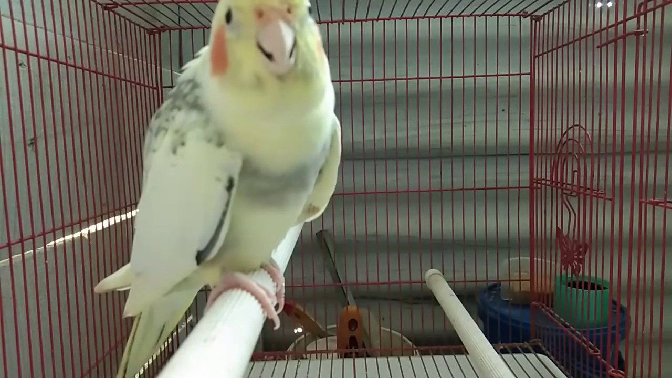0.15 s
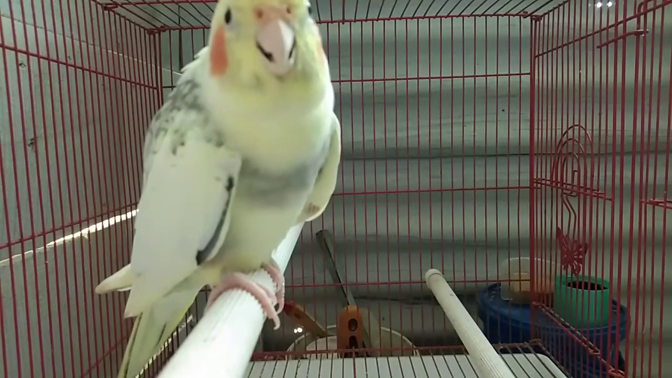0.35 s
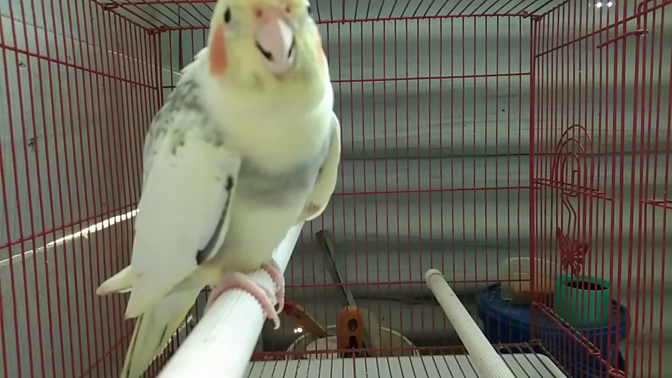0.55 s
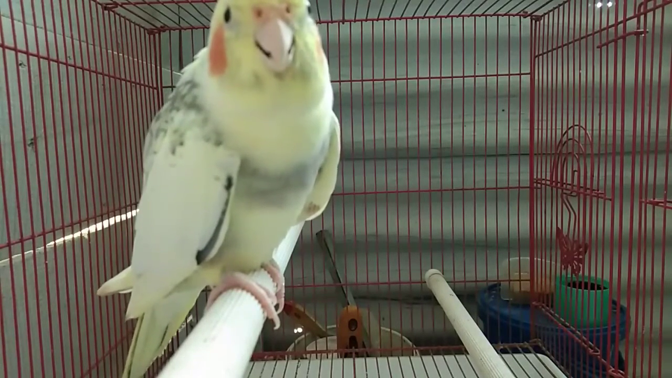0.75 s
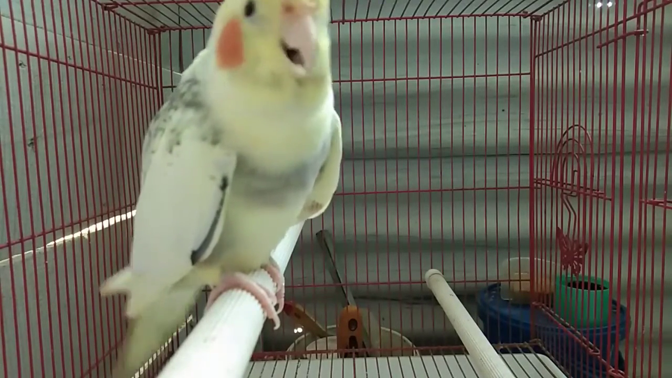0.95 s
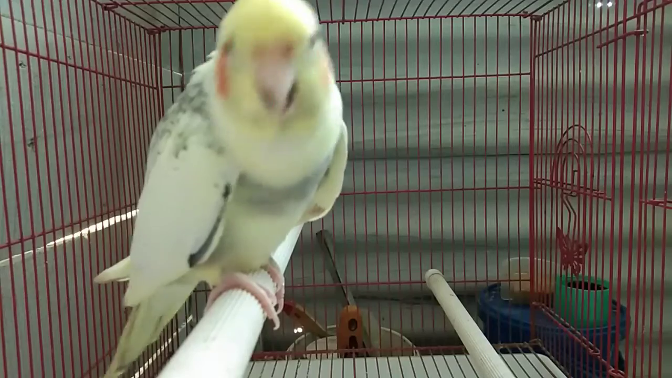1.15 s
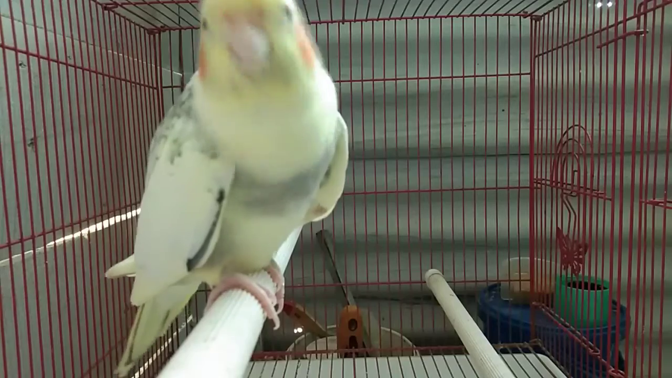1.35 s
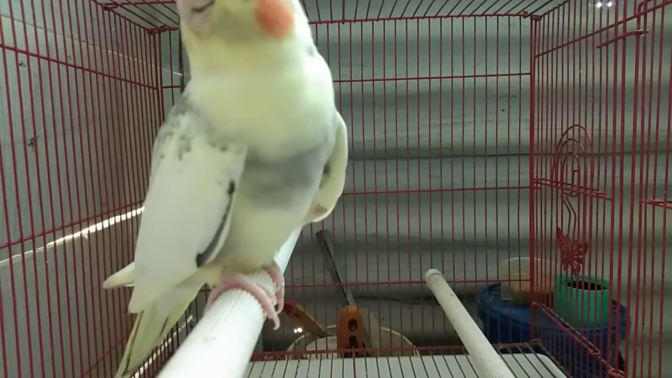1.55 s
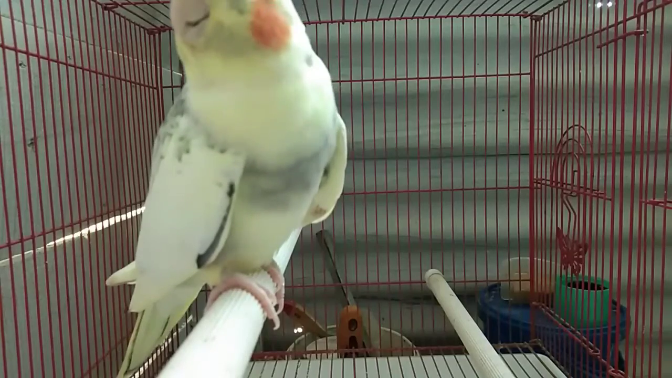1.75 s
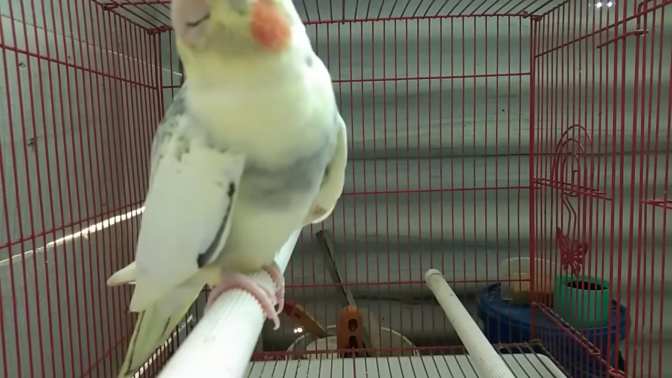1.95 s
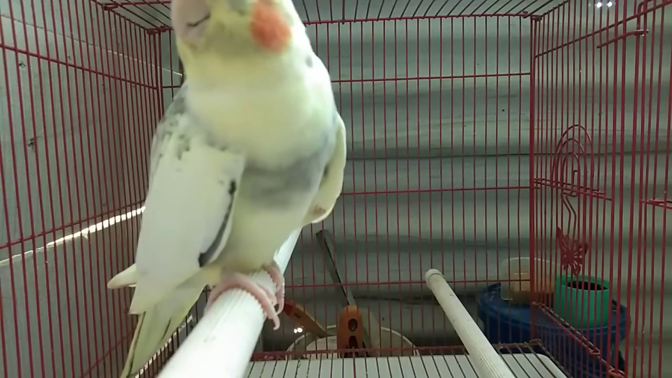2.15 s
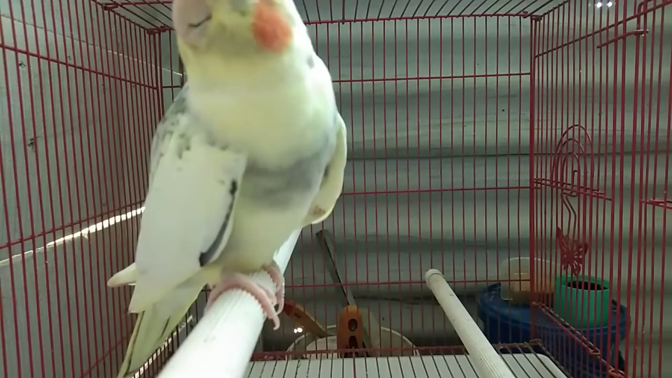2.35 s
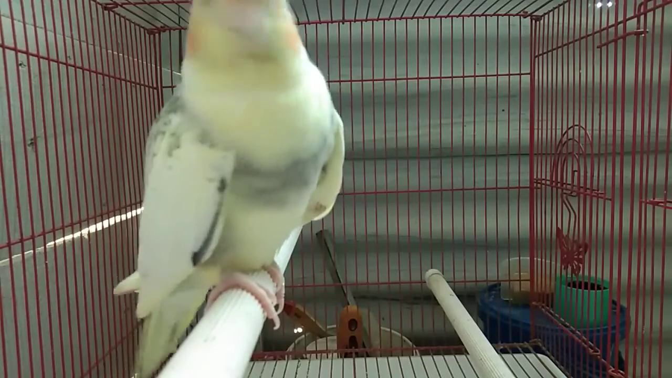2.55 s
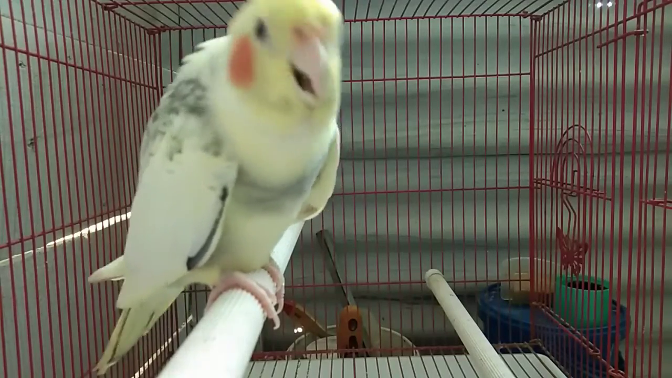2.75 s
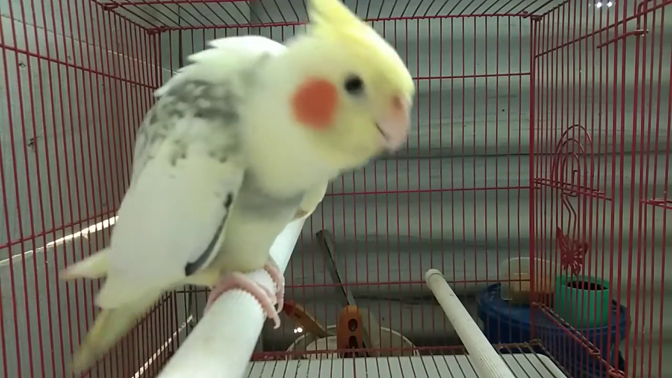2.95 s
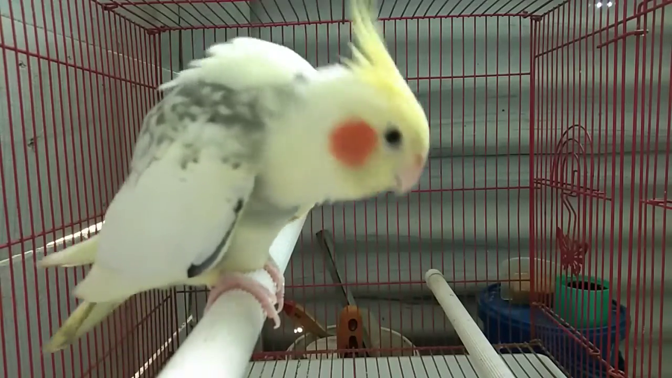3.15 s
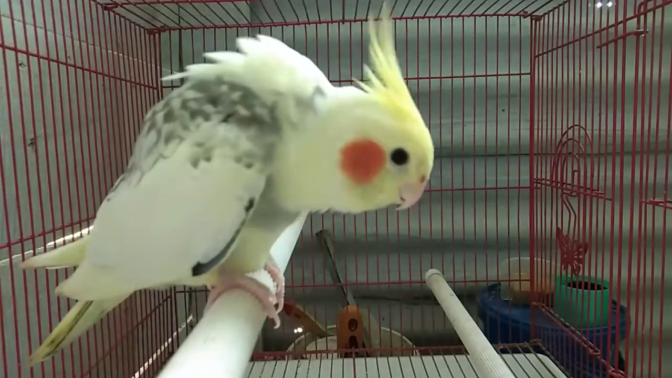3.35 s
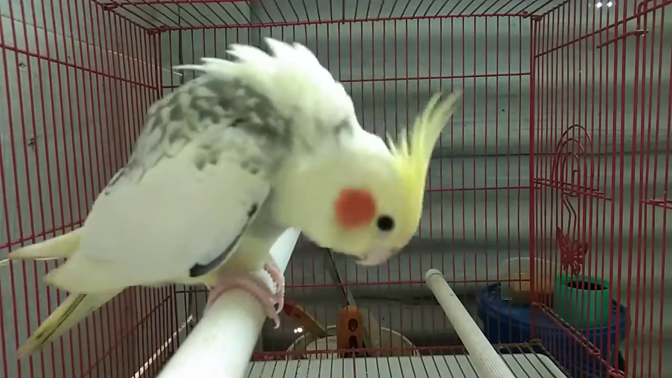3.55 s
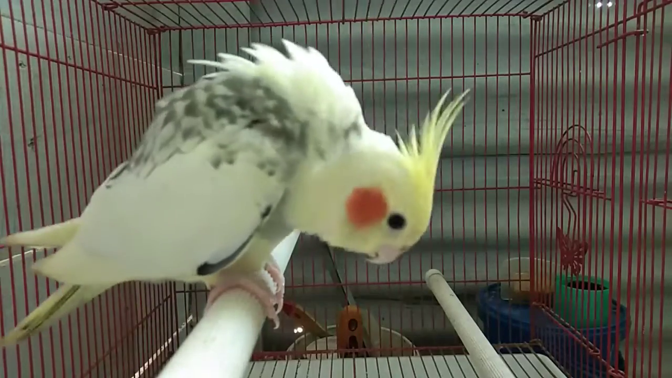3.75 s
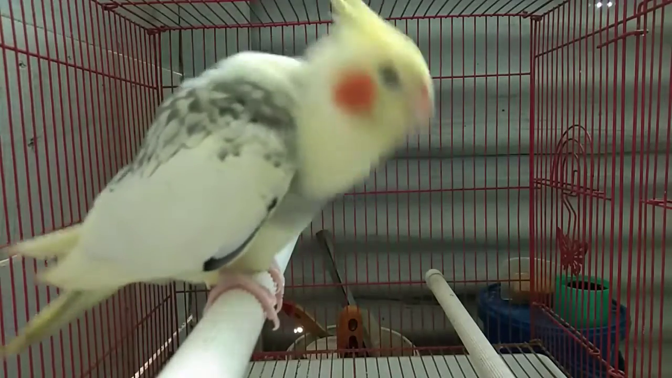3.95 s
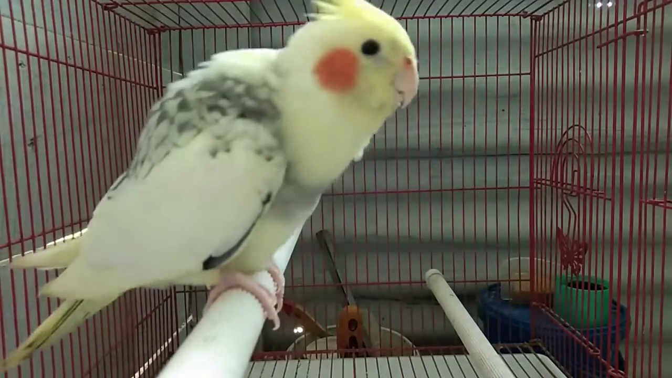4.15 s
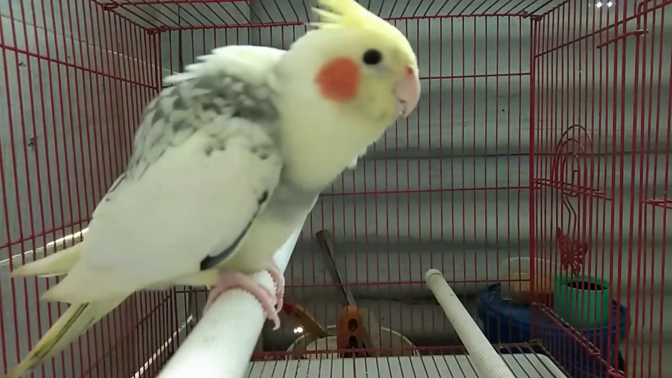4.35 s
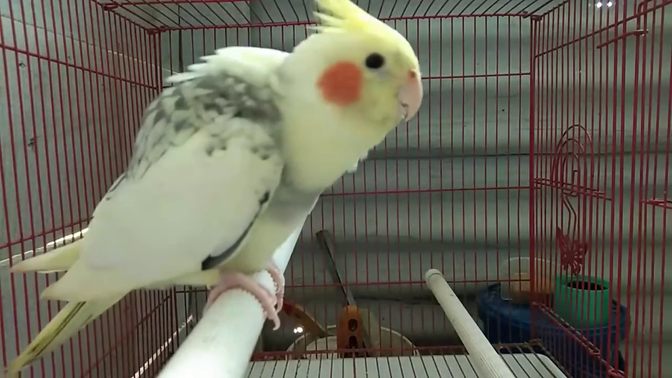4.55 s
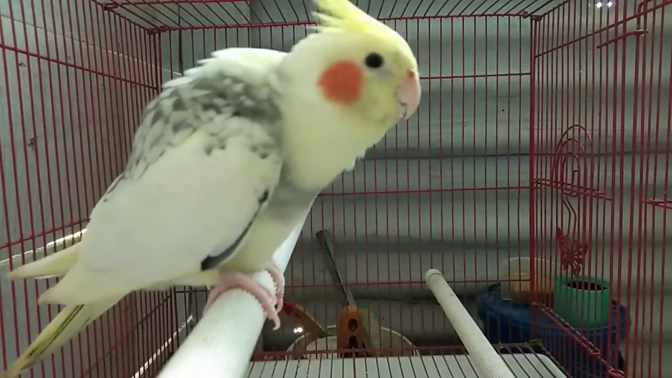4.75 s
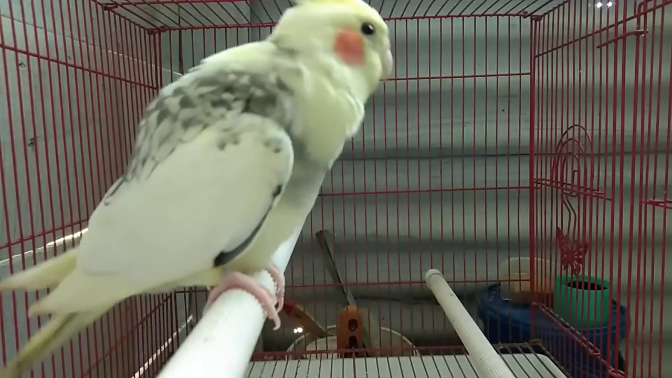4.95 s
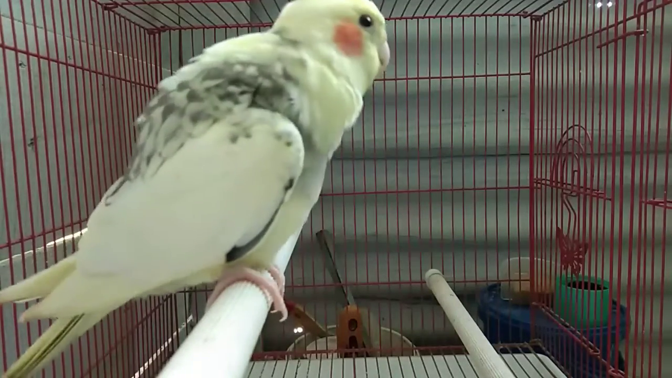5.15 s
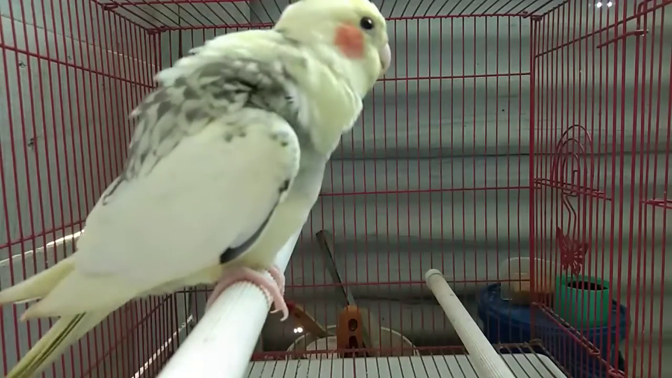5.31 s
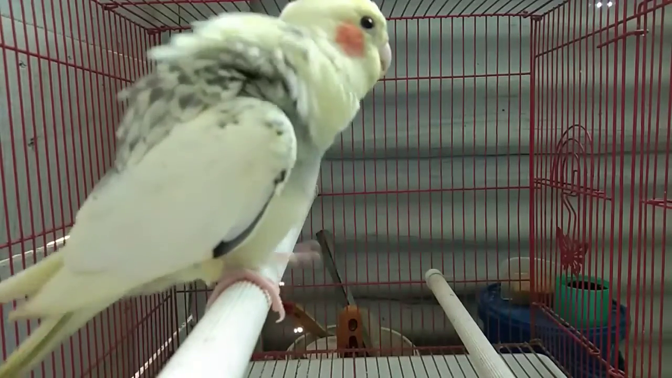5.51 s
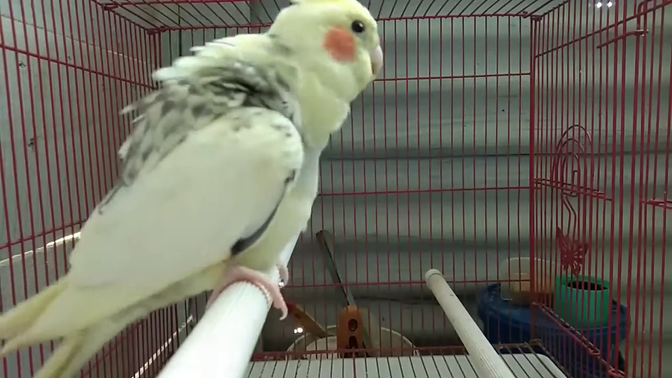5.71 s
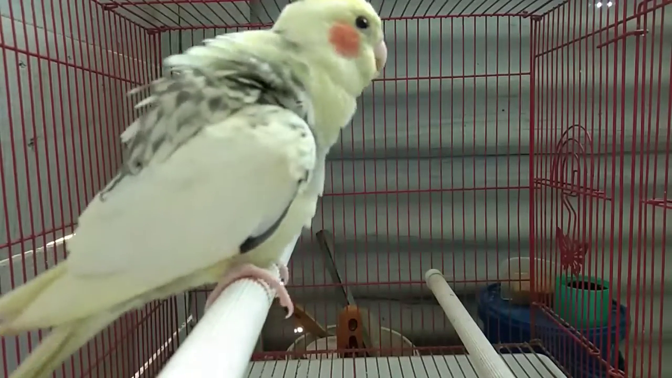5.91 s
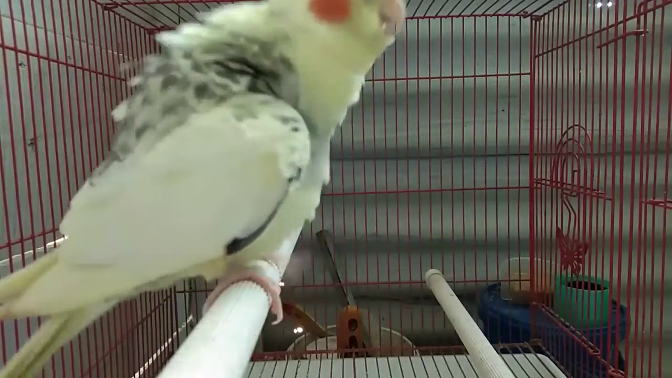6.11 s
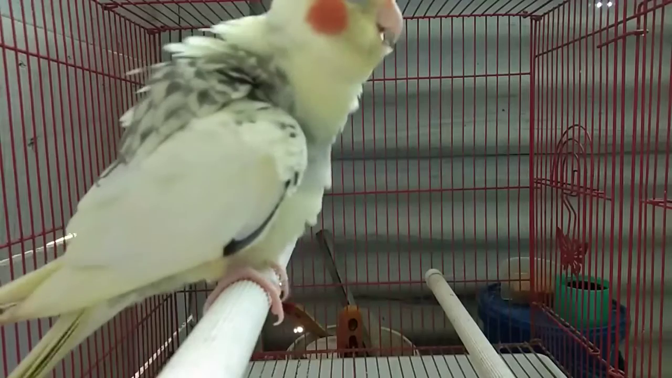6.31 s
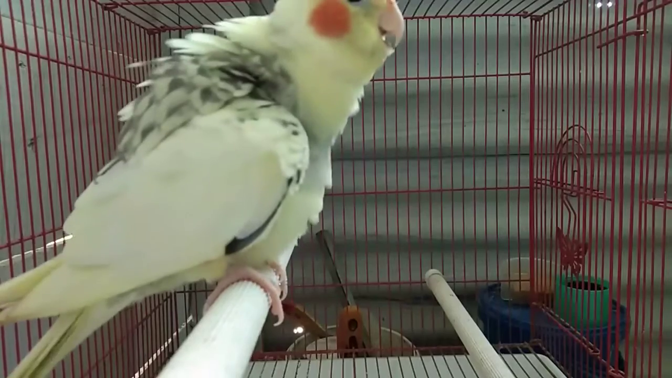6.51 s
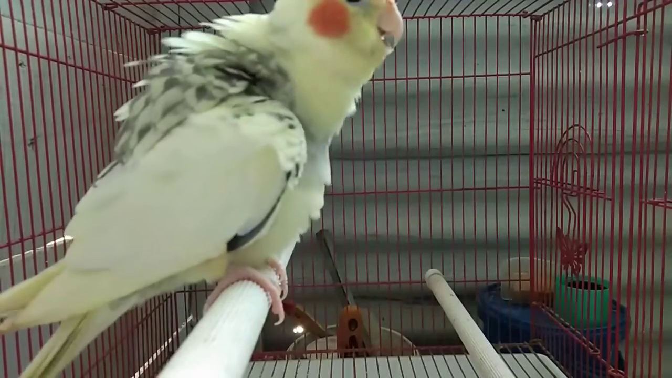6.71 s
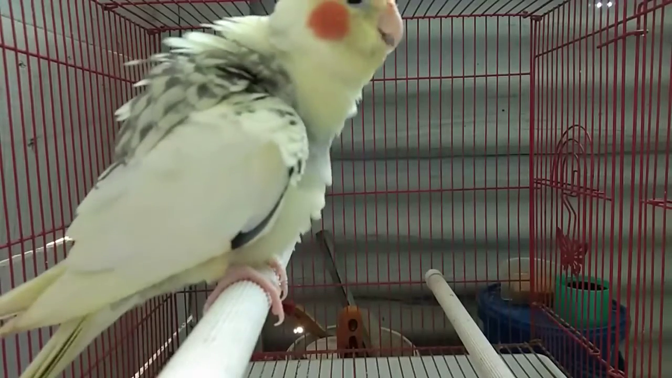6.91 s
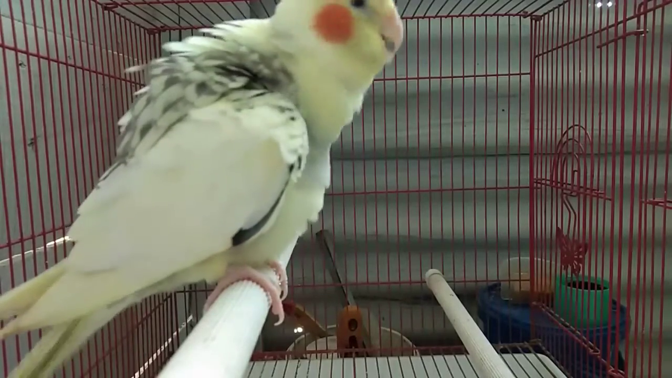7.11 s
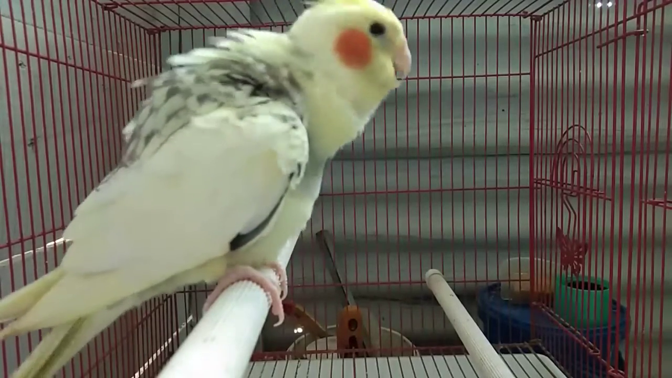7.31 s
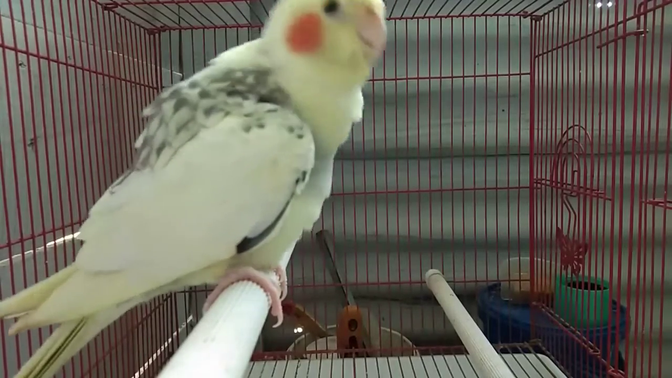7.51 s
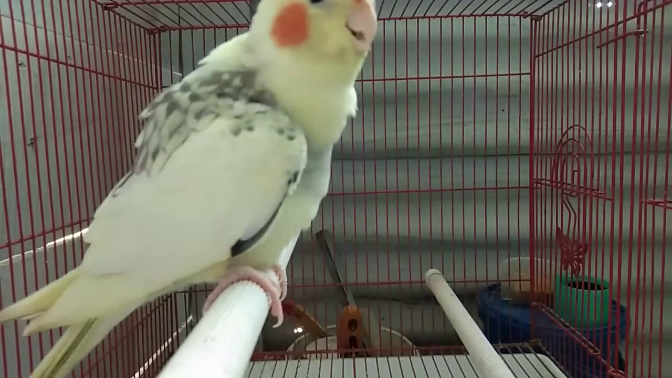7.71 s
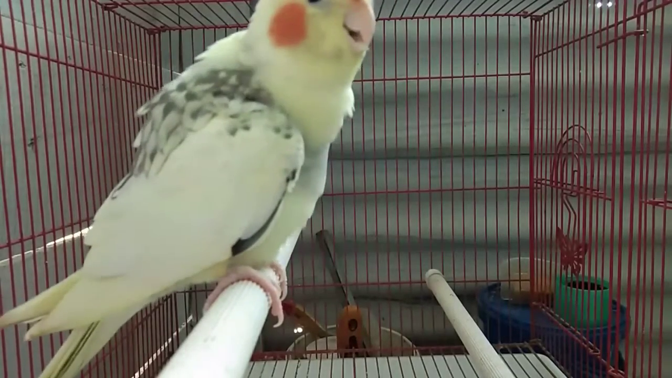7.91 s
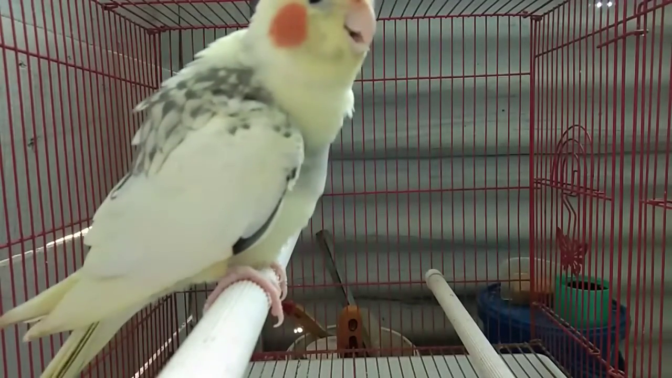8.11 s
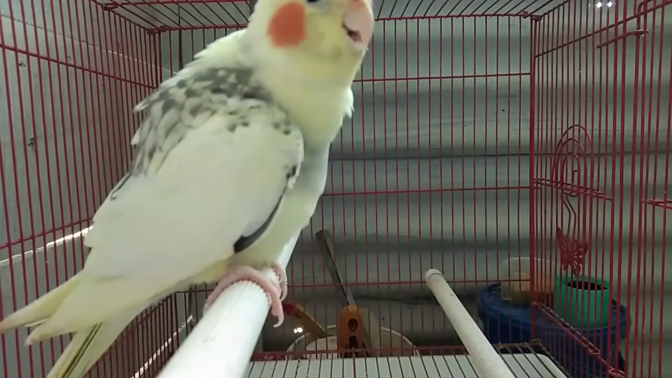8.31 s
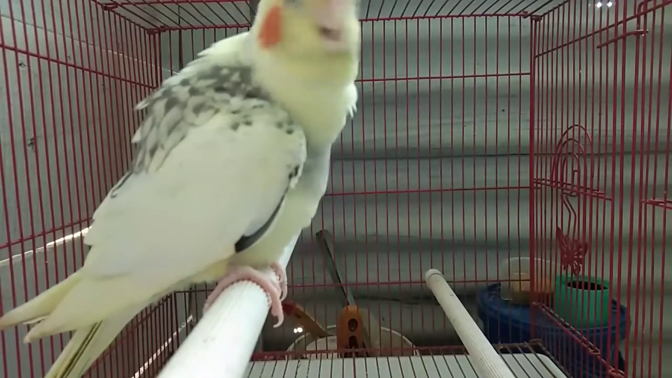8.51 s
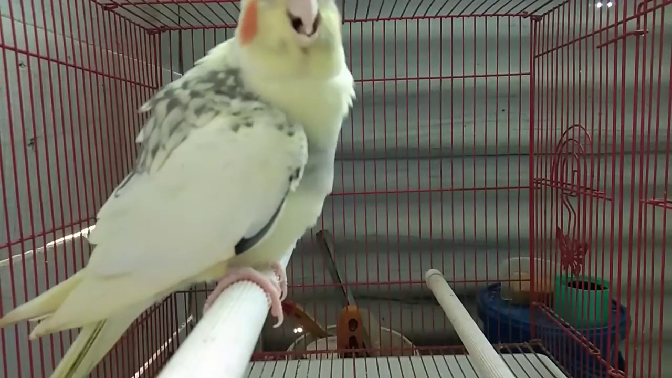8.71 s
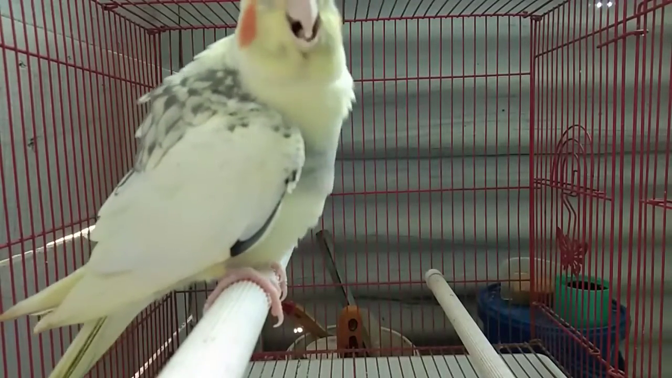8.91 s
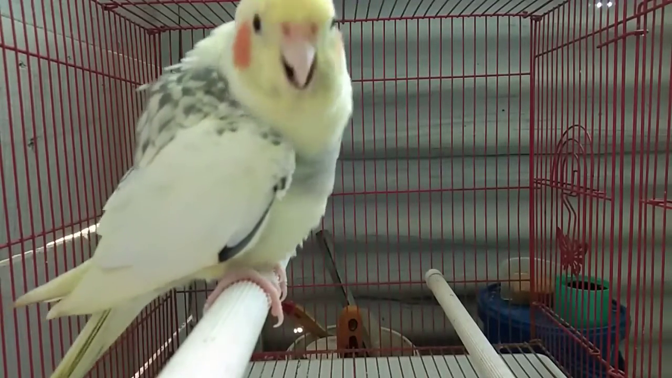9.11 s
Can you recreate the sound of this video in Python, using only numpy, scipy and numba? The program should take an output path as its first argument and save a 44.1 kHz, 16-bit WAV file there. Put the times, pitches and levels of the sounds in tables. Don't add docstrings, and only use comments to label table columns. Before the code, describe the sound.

A small, hard-walled room with a faint low hum, muffled traffic and slight hiss. Far birds give faint chirps at first, with light claw ticks. At 1.0 s a cockatiel close to the phone gives a loud call of about a quarter second, its clear, overtone-rich pitch wavering up and down to a high peak. Farther birds whistle and squawk from 1.5 to 2.5 s, with a claw tick near 1.9. A second near call comes at 2.7 s, then quiet low piping until 4.5. Two harsh, loud scolding rasps strike at 4.7 and 4.9 s, followed by gruffer growls and squawks to 5.6. Claws tick around 6; more chirps and sharp rasps follow to 7. The third loud call comes at 7.2 s. After a quieter gap, a busy cluster of whistles, pipes and rasps runs from 8.3 to about 9.1 s.

```python
import sys
import numpy as np
from scipy import signal
from scipy.fft import rfft, irfft
from scipy.io import wavfile
from scipy.ndimage import uniform_filter1d, minimum_filter1d
from numba import njit

SR = 44100
rng = np.random.default_rng(int(sys.argv[2]) if len(sys.argv) > 2 else 0)


def invert_db(x):
    u = np.asarray(x, float) / 20
    return 10 ** u


def unload_wav(signal):
    wavfile.write(
        sys.argv[1],
        SR,
        np.round(np.clip(np.atleast_2d(signal).T, -1, 1) * 32767).astype(np.int16),
    )


N = 404397


def level(x, db):
    return x * invert_db(db) / np.sqrt(np.mean(x ** 2))


def colour(table, hz):
    f, db = np.transpose(table)
    return invert_db(np.interp(np.log(np.maximum(hz, 1)), np.log(f), db))


def shape(x, table):
    return irfft(rfft(x) * colour(table, np.arange(N // 2 + 1) * SR / N), N)


@njit
def svf(x, hz, width):
    y, b, l = np.empty(len(x)), 0., 0.
    for i in range(len(x)):
        g, k = np.tan(np.pi * hz[i] / SR), width / hz[i]
        v = (b + g * (x[i] - l)) / (1 + g * (g + k))
        b, l, y[i] = 2 * v - b, l + 2 * g * v, k * v
    return y


def band(x, hz, width):
    return svf(x, np.full(N, 1. * hz), 1. * width)


def noise_band(hz, width):
    return band(rng.standard_normal(N), hz, width)


def split(x, order, hz, kind="low"):
    return signal.sosfilt(signal.butter(order, hz, kind, fs=SR, output="sos"), x)


def dull(x, hz):
    return split(x, 6, hz)


def walk(rate, size=N):
    k = max(int(SR / rate), 2)
    held = np.repeat(rng.standard_normal(size // k + 1), k)
    return 1.4 * uniform_filter1d(uniform_filter1d(held, k), k)[:size]


def note(rows, rise_s, fall_s):
    s, *columns = np.transpose(rows)
    at = np.arange(int(s[0] * SR), min(int(s[-1] * SR), N))
    t = at / SR
    gate = np.clip(np.minimum((t - s[0]) / rise_s, (s[-1] - t) / fall_s), 0, 1)
    return at, [np.interp(t, s, c) for c in columns], gate


def room(x, t60_s, wet_db, build_s, direct):
    treble_t60_s = 0.32
    t = np.arange(SR // 2) / SR
    noise = rng.standard_normal(len(t))
    low = split(noise, 2, 5000)
    tail = low * invert_db(-60 * t / t60_s) + (noise - low) * invert_db(-60 * t / treble_t60_s)
    echo = tail * (1 - np.exp(-(t / build_s) ** 2))
    echo = echo * invert_db(wet_db) / np.sqrt(np.sum(echo ** 2))
    return direct * x + signal.fftconvolve(x, echo)[:N]


def passing(passes):
    t = np.arange(N) / SR
    gains = (invert_db(db) / (1 + ((t - s) / span) ** 2) + invert_db(rest_db) for s, span, db, rest_db in passes)
    return 20 * np.log10(sum(gains))


def rumble():
    # closest_s, span_s, peak_db, rest_db
    rumble_pass = [
        (0.05, 0.52, -40.5, -69.5),
        (5.6, 0.31, -51.5, -69.5),
    ]
    hz = 50 + 3.8 * walk(5.0)
    return invert_db(passing(rumble_pass)) * invert_db(2.7 * walk(1.1)) * np.sin(2 * np.pi * np.cumsum(hz) / SR)


def motor_hum():
    # time_s, level_db
    motor = [
        (0.0, -62),
        (0.92, -60),
        (1.43, -50.5),
        (2.6, -42.5),
        (5.03, -49.5),
        (5.23, -44),
        (8.02, -57),
        (9.14, -50.5),
        (9.17, -58),
    ]
    hum_db = np.interp(np.arange(N) / SR, *np.transpose(motor))
    hz = 65 * (1 + 0.019 * walk(1.4))
    return invert_db(hum_db) * invert_db(1.7 * walk(2.4)) * np.sin(2 * np.pi * np.cumsum(hz) / SR)


def drone():
    # closest_s, span_s, peak_db, rest_db
    drone_pass = [
        (4.598, 0.95, -46.5, -49),
    ]
    hz = 128 * (1 + 0.12 * walk(2.5))
    moving = level(svf(rng.standard_normal(N), hz, 15.0), 0.99)
    return invert_db(passing(drone_pass)) * (moving + level(noise_band(175, 59), -8.5))


def traffic():
    # closest_s, span_s, peak_db, rest_db
    traffic_pass = [
        (5.702, .7, -49, -60),
    ]
    lines = sum(invert_db(2.6 * walk(7.8)) * noise_band(hz, 12) for hz in (221, 272.0, 280, 358, 433, 520))
    road = band(noise_band(740, 700), 520, 1200)
    return invert_db(passing(traffic_pass)) * (level(road, -7.0) + level(lines, -13.5))


def flock_murmur(air, birds):
    # time_s, level_db
    murmur = [
        (0, -65),
        (1, -70),
        (1.801, -50.5),
        (2.3, -61),
        (3.3, -58),
        (5.5, -51.5),
        (6.5, -61.5),
        (8.2, -69),
        (8.6, -36),
        (9.17, -40),
    ]
    patches = 0
    for hz in 1600 * 2. ** np.arange(0, 2.2, .3):
        patches = patches + invert_db(3.5 * walk(16)) * band(band(air, hz, hz * 2.4), hz, hz * 0.9)
    settle_s, swell_db, ceiling_db = 0.073, -24, -40.5
    keep = np.exp(-1 / (settle_s * SR))
    swell = invert_db(swell_db) * signal.lfilter([1 - keep], [1, -keep], np.abs(birds))
    gain = invert_db(np.interp(np.arange(N) / SR, *np.transpose(murmur))) + swell
    return np.minimum(gain, invert_db(ceiling_db)) * level(patches, -8.0)


def background(birds):
    # freq_hz, density_db
    air_spectrum = [(12, -62), (20, -33.5), (59, 7), (137, 6.5), (345, -11.5), (482, -10), (637, -28),
                    (1430, -43.5), (1950, -33.5), (2570, -24.5), (3910, -29), (6290, -28), (8310, -46),
                    (11600, -68), (15800, -44.5)]
    air = shape(rng.standard_normal(N), air_spectrum)
    street = rumble() + motor_hum() + drone() + traffic()
    return dull(street, 2900) + flock_murmur(air, birds) + level(air, -49.5)


def claws():
    # time_s, peak_db, knock_re_peak_db
    ticks = [(0.056, -47, -14), (0.373, -54, -7), (0.5422, -49, -22), (1.8619, -30, -4.5),
             (2.2732, -42.5, -15), (2.5097, -41, -3.5), (3.3035, -41, -14), (4.446, -38.5, 8),
             (5.163, -35.5, -4), (5.9661, -32, -17.5), (6.1292, -33.5, -19), (8.447, -33.5, -54)]
    out = np.zeros(N)
    bright = noise_band(1930, 2800) + noise_band(3000, 2500)
    bright = level(dull(dull(bright, 7400), 7400), 0)
    knock = level(dull(noise_band(660, 600), 1800), 0)
    t = np.arange(2000) / SR
    attack = np.minimum(t / 0.00048, 1)
    for s, db, low_db in ticks:
        at = int(s * SR) + np.arange(2000)
        scratch = np.exp(-t / 0.0032) * bright[at]
        thud = invert_db(low_db) * np.exp(-t / 0.002) * knock[at]
        out[at] += invert_db(db - 4.0) * attack * (scratch + thud)
    return out


def sung(events, peak_share, onset_db, end_db, octave_db):
    stages = ((0, onset_db), (peak_share, 0), (1, end_db))
    return [[(s + share * length, hz + share ** .8 * (last_hz - hz), db + under, db + under + octave_db)
             for share, under in stages]
            for s, length, hz, last_hz, db in events]


def far_notes(notes, scatter, third_db=-13, thin_db=-4):
    out = np.zeros(N)
    for rows in notes:
        at, (hz, first_db, octave_db), gate = note(rows, .012, .012)
        size = len(at)
        waver = .55 * walk(60, size) + 1.2 * walk(500, size)
        hz = uniform_filter1d(hz, 300) * (1 + scatter * waver)
        broken = invert_db(np.sqrt(scatter) * 20 * walk(170, size))
        phase = 2 * np.pi * np.cumsum(hz) / SR
        tone = invert_db(first_db) * np.sin(phase) + invert_db(octave_db) * np.sin(2 * phase)
        for k in range(3, 7):
            loss_db = -9 * np.clip(k * hz / 1000 - 6.6, 0, 3)
            tone += invert_db(octave_db + third_db + thin_db * (k - 3) + loss_db) * np.sin(k * phase)
        out[at] += np.sqrt(2) * gate * broken * tone
    return out


def far_whistles():
    # start_s, length_s, first_hz, last_hz, level_db
    whistle = [(.72, 0.14, 2530, 2560, -67.5), (1.81, 0.074, 1800, 1960, -49), (1.95, .09, 3170, 3130, -57),
               (2.0, .05, 2600, 2560, -63), (2.34, .05, 3050, 3420, -62), (3.99, 0.061, 1810, 2040, -42),
               (4.45, 0.06, 1620, 1780, -45), (6.47, 0.079, 3000, 3000, -63),
               (7.66, 0.16, 3460, 2570, -62.5), (7.96, 0.057, 3580, 3325, -62),
               (8.04, .06, 2920, 2296, -76.5), (8.33, 0.11, 2680, 2866, -35)]
    chirp = [
        (.213, 0.074, 2680, 3660, -50.5),
        (.93, 0.087, 2115, 2640, -47.5),
        (1.76, 0.031, 2800, 2760, -33),
        (2.058, 0.026, 1850, 1850, -42.5),
        (2.072, 0.029, 2230, 2540, -44),
        (2.1, 0.035, 3000, 3000, -49.5),
        (5.858, 0.062, 2896, 2760, -42),
        (6.85, 0.044, 2880, 2900, -44.5),
    ]
    squawk = [
        (.79, 0.085, 2550, 2620, -66.5),
        (1.49, 0.1, 2400, 2740, -56.5),
        (5.19, 0.075, 1900, 2150, -47),
        (5.362, 0.11, 2224, 2280, -37),
        (5.525, 0.047, 2297, 2260, -42),
        (5.8, 0.064, 2000, 2250, -54),
    ]
    croak = [
        (1.7, 0.12, 2500, 2540, -42),
        (5.325, 0.051, 2976, 2790, -28.5),
        (6.165, 0.084, 2790, 2690, -41.5),
        (6.235, 0.055, 2720, 2690, -45),
        (1.49, .15, 2500, 2600, -50),
    ]
    held = [
        (1.53, 0.175, 3350, 3416, -33.5),
        (3.765, 0.13, 2070, 2880, -49.5),
        (3.9, 0.12, 2883, 2960, -46.5),
        (8.515, 0.15, 3380, 3320, -35),
    ]
    dive = [(5.825, .04, 4600, 2900, -44), (6.205, .06, 5300, 3100, -40), (1.79, .11, 2650, 1900, -43),
            (5.436, 0.0445, 3700, 3400, -32), (2.49, .19, 2960, 2700, -55.5),
            (8.535, .06, 2750, 2600, -31.5), (8.585, 0.098, 2500, 2600, -45),
            (5.285, 0.038, 2460, 2270, -36.5), (8.48, 0.037, 2900, 3000, -41), (8.97, .04, 2800, 2300, -40),
            (6.6, .05, 3300, 3500, -39)]
    sweep = [
        (1.675, 0.044, 1820, 2600, -48),
        (2.38, .07, 2110, 2430, -55),
        (2.44, .06, 2447, 2970, -53),
        (8.258, 0.035, 1680, 2400, -44),
    ]
    return (far_notes(sung(whistle, .05, -5, -11, -24.5), .018)
            + far_notes(sung(chirp, .05, -1.5, -12, -7), .022)
            + far_notes(sung(squawk, .4, -9, -10, 8), .042)
            + far_notes(sung(croak, .3, -4, -6, -14), .032)
            + far_notes(sung(held, .4, -7.5, -8, -35), .011)
            + far_notes(sung(dive, .5, -3, -3, -42), .032)
            + far_notes(sung(sweep, .15, -30, -1, -11), .022))


def far_piping():
    # start_s, length_s, first_hz, last_hz, level_db
    piping = [
        (3.135, 0.035, 1883, 1636, -42.5),
        (3.295, 0.051, 1787, 1717, -51.5),
        (8.285, 0.075, 2380, 2600, -33.5),
        (8.444, 0.028, 1886, 1880, -46),
    ]
    reed = [
        (3.478, 0.09, 1643, 1282, -62),
        (3.552, 0.086, 1290, 1450, -61.5),
        (3.619, 0.13, 1450, 1450, -62.5),
        (3.72, 0.046, 1465, 1630, -60.5),
        (3.865, 0.072, 1383, 1540, -60),
        (3.92, 0.062, 1545, 1576, -58.5),
        (3.97, 0.079, 1634, 1920, -69),
        (4.35, 0.13, 1246, 1710, -64),
        (4.619, 0.087, 1304, 1490, -59.5),
    ]
    notes = sung(piping, .3, -5, -10, -4) + sung(reed, .9, -0.5, -1.5, 5.5)
    return far_notes(notes, .016, third_db=-3)


def scold_rows(s, rise, length, db, hz):
    hold_share, beak_sag = 0.32, 0.97
    times = (s, s + rise, s + rise + hold_share * (length - rise), s + length)
    levels = db + np.array([-11, 0, -2, -23.5])
    chest_db = np.minimum(-17.5 - 0.3 * (levels + 10), 0)
    return np.c_[times, levels, hz * np.array([1, 1, 1, beak_sag]), chest_db]


def rasp_source(pulse_hz=480, ragged=.35, breath=.4, scatter_db=3):
    formants_hz = [2120, 2480, 3140, 3630, 4200, 4670, 5340, 5900, 6300, 7066]
    # freq_hz, density_db
    scold = [(710, -70), (1200, -44.5), (1660, -25), (1890, -16), (2100, -24), (2640, -13.5), (3900, 3),
             (4520, 0), (6250, -4), (7350, -16), (9420, -30), (11500, -35), (14700, -37.5), (15800, -61)]
    cycle = np.cumsum(pulse_hz * np.exp(ragged * walk(200)) / SR)
    pulse_db = scatter_db * rng.standard_normal(N // 20)[cycle.astype(int)]
    puff = np.exp(-(cycle % 1) / .35) * invert_db(pulse_db)
    source = (puff + breath) * rng.standard_normal(N)
    flares = sum(invert_db(3 * walk(70)) * svf(source, hz * (1 + .04 * walk(25)), 400.) for hz in formants_hz)
    return shape(invert_db(-10.0) * source + flares, scold)


def rasps():
    # start_s, rise_s, length_s, peak_db, beak_hz
    bold = [
        (4.69, 0.1, 0.12, -11.5, 5700),
        (4.893, 0.038, 0.092, -7.5, 5700),
        (6.542, 0.044, 0.072, -20, 5970),
        (6.645, 0.041, 0.088, -16.5, 5260),
        (6.872, 0.044, 0.094, -22, 5760),
        (8.69, 0.03, 0.075, -18.5, 4800),
    ]
    gruff = [
        (5.185, 0.04, .11, -28, 4000),
        (5.355, 0.022, 0.085, -18, 4420),
        (5.508, 0.035, 0.07, -21.5, 4690),
        (6.215, .04, .07, -30, 3700),
        (8.445, .012, .065, -33, 3750),
    ]
    thin = [
        (6.245, 0.041, 0.071, -24.5, 5400),
        (8.84, 0.053, 0.1, -23, 4860),
        (8.97, 0.09, 0.17, -20, 4900),
        (6.13, 0.017, 0.086, -43, 5000),
    ]
    wheeze = [
        (1.475, .06, .2, -44, 5100),
        (1.7, .07, .13, -46, 7600),
        (8.52, 0.04, .17, -46, 5500),
    ]
    birds = ((bold, (4.5, -5, -5.5, -12)), (gruff, (2, -4, -12, -5)),
             (thin, (5, -21, -5.5, -12)), (wheeze, (-10, -10, -22, -3)))
    source = rasp_source()
    high = level(split(source, 3, 3400, "high"), 0)
    chest = level(split(source, 3, 3400), 0)
    gain, beak_hz = np.zeros(N), np.full(N, 5000.)
    upper_gain, bottom_gain, broad_gain, beak_gain = np.zeros((4, N))
    for table, (own_db, bottom_db, broad_db, beak_db) in birds:
        for rasp in table:
            at, (db, hz, chest_db), gate = note(scold_rows(*rasp), 0.009, 0.011)
            gain[at], beak_hz[at] = gate * invert_db(db), hz
            upper_gain[at] = invert_db(chest_db + own_db)
            bottom_gain[at] = invert_db(chest_db + own_db + bottom_db)
            broad_gain[at], beak_gain[at] = invert_db(broad_db), invert_db(beak_db)
    beak = level(svf(high, beak_hz * (1 + 0.027 * walk(20)), 1300.), 0)
    bottom, upper = split(chest, 5, 2510), split(chest, 5, 2510, "high")
    return gain * (broad_gain * high + beak_gain * beak + upper_gain * upper + bottom_gain * bottom)


def cage(x):
    # freq_hz, width_hz, cancelled_share
    notches = [(2600, 170, .7), (3200, 170, .75), (3800, 180, .4), (4720, 280, .7), (5500, 350, .5),
               (6850, 300, .4)]
    # delay_s, gain
    echoes = [
        (.0013, -0.066),
        (.0027, -0.043),
        (.0046, .35),
    ]
    for hz, width, share in notches:
        x = x - share * band(x, hz, width)
    return x + sum(gain * np.roll(x, int(s * SR)) for s, gain in echoes)


def glide(s, hz, t):
    step = np.diff(hz) / np.diff(s)
    same = np.maximum(step[1:] * step[:-1], 0)
    slope = np.r_[step[0], 2 * same / (step[1:] + step[:-1] + 1e-9), 0]
    k = np.clip(np.searchsorted(s, t) - 1, 0, len(s) - 2)
    h = s[k + 1] - s[k]
    u = (t - s[k]) / h
    ease = u * u * (3 - 2 * u)
    bend = h * u * (1 - u) * ((1 - u) * slope[k] - u * slope[k + 1])
    return hz[k] + ease * (hz[k + 1] - hz[k]) + bend


def call_rows(start, length, db, dip_hz, last_hz):
    # pitch_hz, level_db, overtone_slope_db
    call_shape = [
        (1260, -25, -1),
        (1450, -18.5, 0.5),
        (2212, -14, -2.5),
        (1666, -9, -0.5),
        (2493, -13.5, -2),
        (1760, -11.5, 1),
        (2560, -8.5, -2),
        (3000, -6.5, -14.5),
        (2760, -18.5, -13),
    ]
    turn_share = [0, .116, .27, .439, .626, .79, .93, 1, 1.046]
    hz, level_db, slope = np.transpose(call_shape)
    point = np.arange(9)
    hz = hz + dip_hz * np.isin(point, (3, 5)) + last_hz * (point > 5)
    s = start + length * np.array(turn_share)
    return np.c_[s, hz, level_db + db], np.c_[s, slope]


def cockatiel(jitter=0.011, flutter_db=2.5):
    # freq_hz, gain_db
    throat = [(1100, -17.5), (1400, -3.5), (1750, -10.5), (2150, -3.5), (2500, 2.5), (2950, 3),
              (3400, 10.5), (4300, -1), (5200, -2), (6600, -8), (7600, -21), (9200, -42), (11800, -53),
              (15800, -36)]
    # start_s, last_peak_after_s, level_db, dip_lift_hz, last_peak_lift_hz
    calls = [
        (1.021, .251, 1, 0.71, -120),
        (2.704, .24, .8, 1.3, 64.5),
        (7.162, .24, 1.5, 85, 44),
    ]
    out = np.zeros(N)
    for call in calls:
        rows, beak = call_rows(*call)
        at, (_, db), gate = note(rows, 0.0012, .004)
        size = len(at)
        s, turns, _ = np.transpose(rows)
        hz = glide(s, turns, at / SR) * (1 + jitter * walk(400, size))
        phase = 2 * np.pi * np.cumsum(hz) / SR
        slope_db = np.interp(at / SR, *np.transpose(beak))
        tone, power = 0, 0
        for k in range(1, 13):
            beak_db = slope_db * min(k - 1, 3) - 2.5 * max(k - 6, 0)
            gain = colour(throat, k * hz) * invert_db(beak_db) * (k * hz < 15800)
            flutter = invert_db(flutter_db * walk(90, size))
            rough = .45 * max(k - 4, 0) * walk(300, size)
            tone = tone + gain * flutter * np.sin(k * phase + k * k + rough)
            power = power + gain ** 2 / 2
        decay = np.exp(-(at - at[0]) / (0.0012 * SR))
        tick = invert_db(-6.5) * decay * dull(rng.standard_normal(size), 7000)
        out[at] += invert_db(db) * (gate * tone / np.sqrt(power) + tick)
    return out


def scene():
    t60_s, far_t60_s = 0.32, 0.34
    near = room(cage(cockatiel()), t60_s, -10, 0.0068, 0.85)
    far = room(far_whistles() + far_piping(), far_t60_s, -1.2, 0.006, 0.93)
    scolding = room(rasps(), t60_s, 0.83, 0.0047, 0.98)
    ticking = room(claws(), far_t60_s, 2, 0.0044, 0.87)
    birds = near + far + scolding + ticking
    return (birds + background(birds))[None]


def top_cut(x):
    return signal.sosfilt(signal.butter(12, 16580, fs=SR, output="sos"), x)


def record(dry):
    # freq_hz, gain_db
    microphone = [(9500, 0), (10800, -1), (12000, -8), (13800, 5), (15600, 9)]
    ceiling = 0.77
    hiss = level(noise_band(8600, 4000), -81.5)
    heard = shape(dry[0] + hiss, microphone)
    held = minimum_filter1d(np.minimum(ceiling / (np.abs(heard) + 1e-9), 1), size=41)
    flat = heard * uniform_filter1d(held, size=31)
    flat = flat + invert_db(-33) * band(1 - held, 700, 1400)
    flat = signal.sosfilt(signal.ellip(10, .2, 60, 15560, fs=SR, output="sos"), flat)
    return top_cut(flat[None])


dry = scene()
out = record(dry)
unload_wav(out)
```